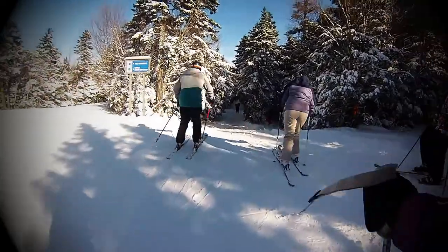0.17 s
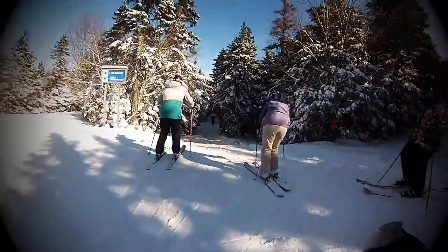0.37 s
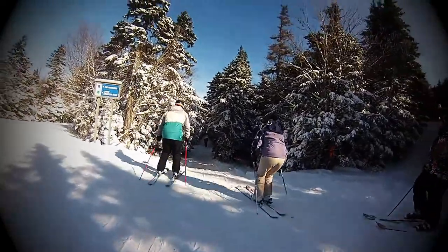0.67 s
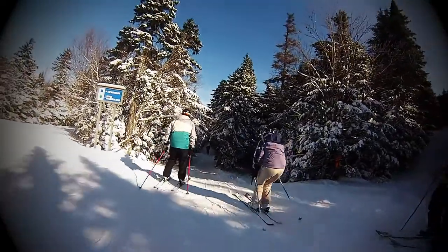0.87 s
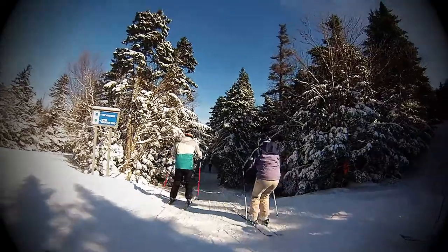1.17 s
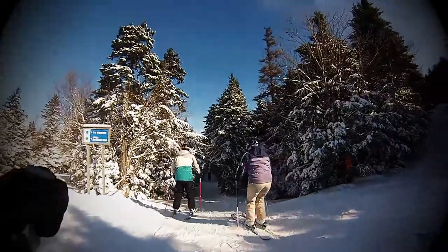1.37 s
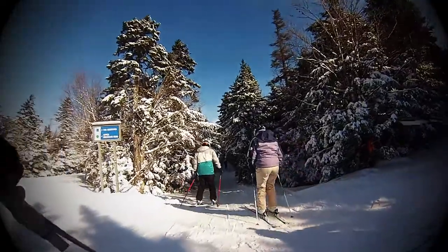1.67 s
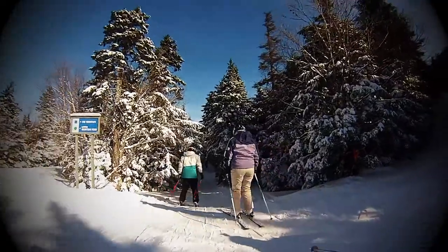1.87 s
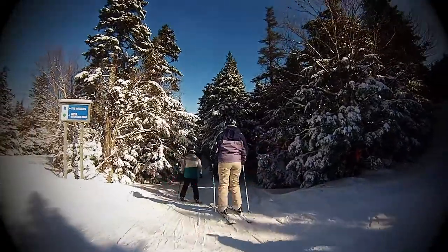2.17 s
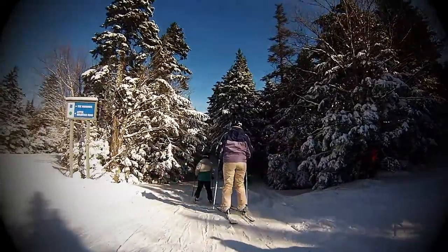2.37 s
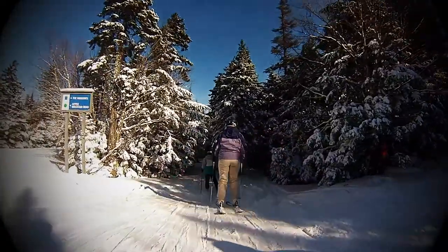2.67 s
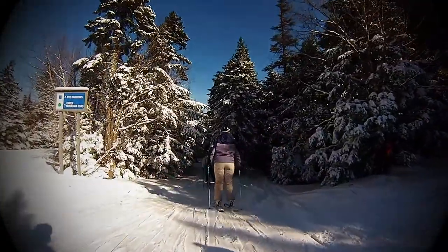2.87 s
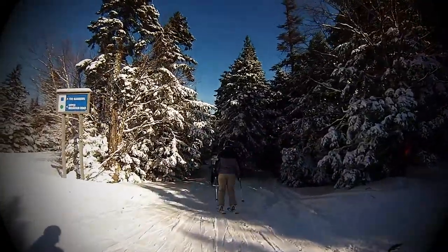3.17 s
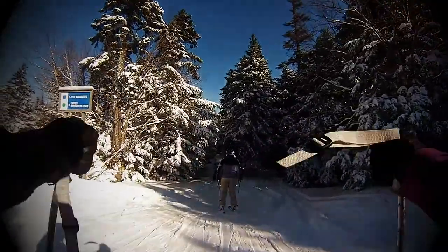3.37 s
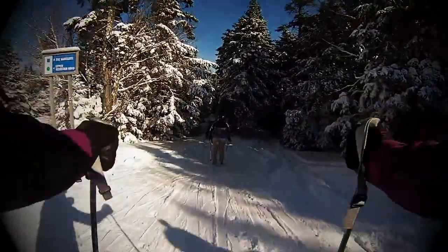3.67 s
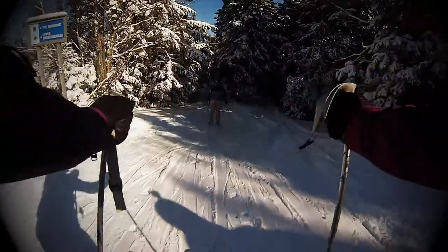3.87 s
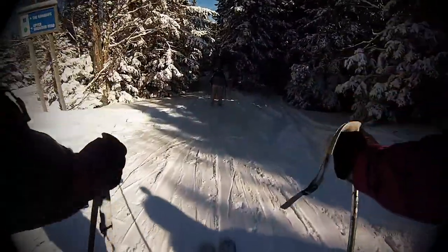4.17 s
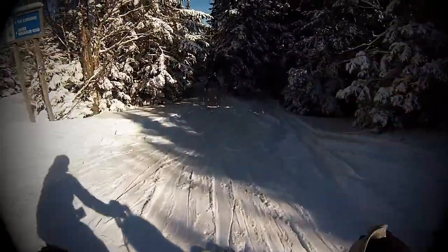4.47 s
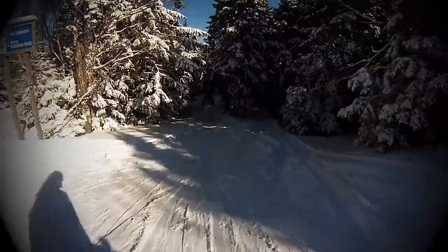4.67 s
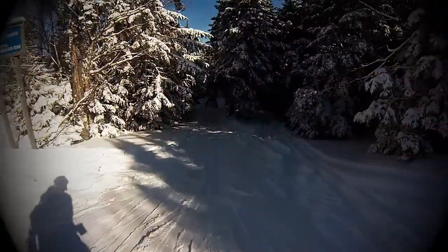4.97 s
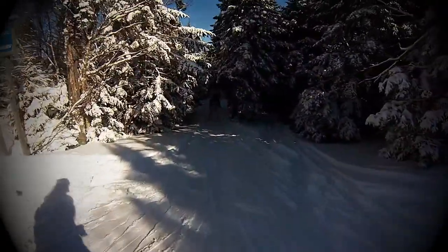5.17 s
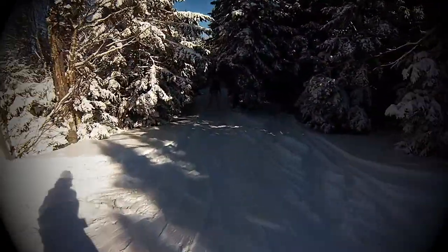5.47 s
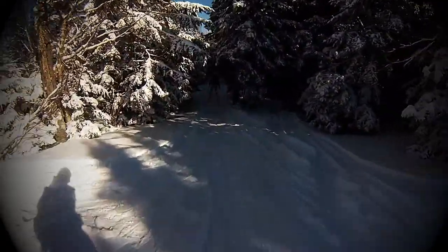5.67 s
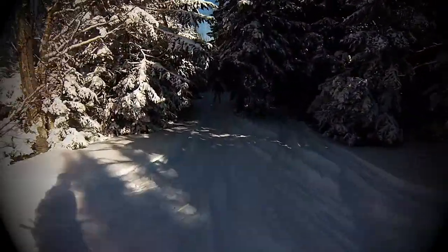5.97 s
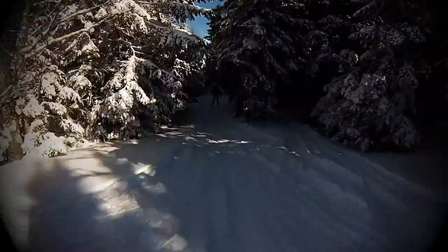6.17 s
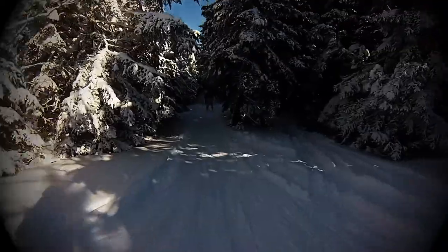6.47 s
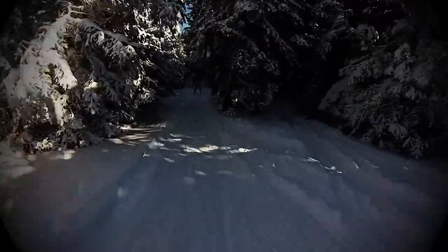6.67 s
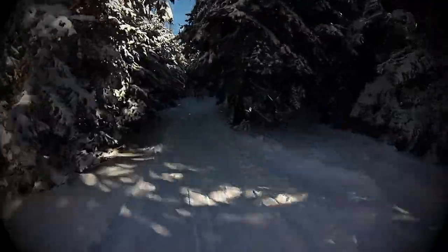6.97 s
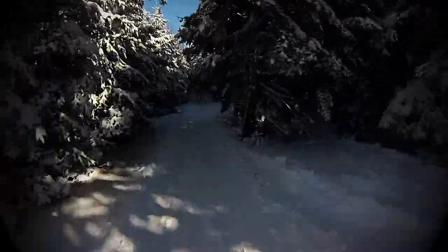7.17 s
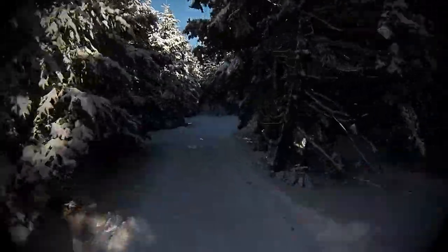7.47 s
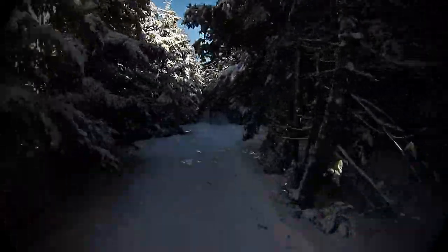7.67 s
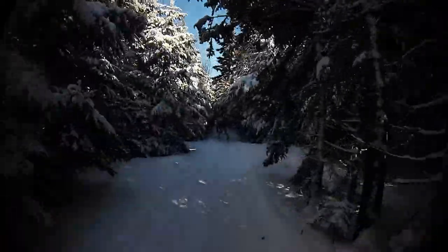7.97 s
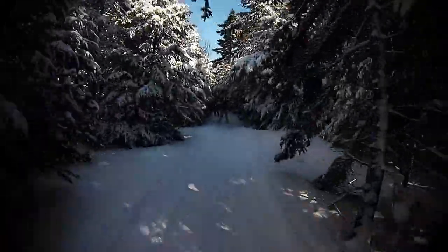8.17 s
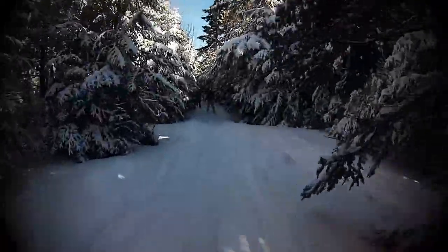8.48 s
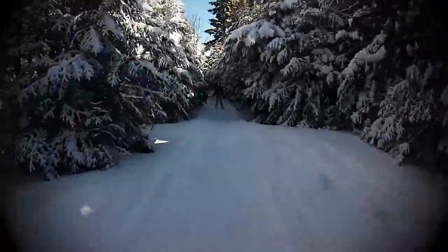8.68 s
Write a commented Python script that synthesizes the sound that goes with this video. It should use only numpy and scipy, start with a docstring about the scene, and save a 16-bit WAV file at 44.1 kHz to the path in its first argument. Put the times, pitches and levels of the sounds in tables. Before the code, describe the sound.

Close-up skiing: rattly slapping skis, crunching snow and gear knocks under rumbling wind gusts, fading into a faint glide with sparse clicks.

```python
"""Skis on packed snow

Heard from a camera worn by the skier: everything is close, and only the spray has stereo width.
Bases, edges and packing snow are random grains ringing resonances, pulsed by ridges and pushes.
Slaps, knocks and ticks are short bursts or rings; groans are rough tones; carving edges sing.
Wind on the microphone is filtered noise with a throb and single low-pitched eddies.
"""
import sys
import numpy as np
from scipy import signal
from scipy.fft import rfft, irfft
from scipy.io import wavfile
from scipy.ndimage import uniform_filter1d, map_coordinates

SR = 44100
rng = np.random.default_rng(int(sys.argv[2]) if len(sys.argv) > 2 else 0)


def inscribe(sig):
    """Save sig as 16-bit PCM at rate SR to the path in sys.argv[1].

    A 1-D sig is mono; a 2-D sig holds one channel per row.
    Samples are clipped to [-1, 1] before scaling.
    """
    pcm = np.round(np.clip(np.atleast_2d(sig).T, -1, 1) * 32767)
    wavfile.write(sys.argv[1], SR, pcm.astype(np.int16))


N = 389844
TIME = np.arange(N) / SR
TAPS = 8192  # length of the filter design [samples]
HZ = np.fft.rfftfreq(TAPS, 1 / SR)


def gain_of(db):
    """Decibels to amplitude."""
    return 10 ** (np.asarray(db) / 20)


def evened(x):
    """Scales to rms 1."""
    return x / np.sqrt(np.mean(x ** 2) + 1e-20)


def curve(rows, axis=1):
    """One column of a control table, joined by straight lines, at every sample."""
    rows = np.asarray(rows)
    return np.interp(TIME, rows[:, 0], rows[:, axis])


def swell(events, axis):
    """Smooth rises and falls [dB] for (centre, length, ..) rows, as high as the given column."""
    total_db = 0
    for row in events:
        half_turns = np.clip((TIME - row[0]) / row[1], -.5, .5)
        total_db = total_db + row[axis] * np.cos(np.pi * half_turns)
    return total_db


def read(points, hz=HZ):
    """A spectrum table on a log-frequency axis."""
    f, value = np.transpose(points)
    return np.interp(np.log(hz + 1), np.log(f + 1), value)


def add(mix, s, sound):
    """Mixes a sound in at time s."""
    part = mix[max(round(s * SR), 0):][:len(sound)]
    part += sound[:len(part)]


def body(modes):
    """Gain over frequency of steep-sided resonances, their powers summed."""
    power = 0
    for f, width, db in modes:
        detuning = (HZ ** 2 - f ** 2) / (2 * (HZ + 1) * width)
        power = power + (gain_of(db) / (1 + detuning ** 2 * 2)) ** 2
    return np.sqrt(power)


def colour(x, gain):
    """Minimum-phase filter with the given gain over frequency, scaled to a top gain of 1."""
    log_gain = np.log(np.maximum(gain / gain.max(), 1e-5))
    circle = np.concatenate([log_gain, log_gain[-2:0:-1]])
    response = irfft(np.exp(np.conj(signal.hilbert(circle)))[:len(HZ)])
    return signal.fftconvolve(x, response[:TAPS // 2])[:len(x)]


def wander(rate_hz):
    """Slow chance of rms 1, up to about the given rate."""
    hz = np.fft.rfftfreq(N, 1 / SR)
    shape = hz / (hz + 2) / (1 + (hz / rate_hz) ** 4)
    return evened(irfft(rfft(rng.standard_normal(N)) * shape, N))


def grains(per_s, spread_db, smooth):
    """Snow crystals breaking: clicks of uneven size over a smooth rub."""
    size = gain_of(spread_db * np.minimum(rng.exponential(1, N), 4))
    clicks = size * rng.choice([-1, 1], N) * (rng.random(N) < per_s / SR)
    return evened(evened(clicks) + smooth * rng.standard_normal(N))


def rub(drive, gain, pressure_db):
    """A drive, pulsed by the pressure, rings a resonant body; rms 1."""
    return evened(colour(drive * gain_of(pressure_db), gain))


def flex(x, share, rate_hz):
    """The skis bend, so their resonances slide up and down by a small share."""
    position = np.cumsum(1 + share * wander(rate_hz))
    return map_coordinates(x, [position], order=3, mode="mirror")


# ridges in the track: (time [s], depth of the chatter [dB], mean rate [ridges/s])
RIDGES = [(0, 0.5, 35.5), (.36, 0.5, 31.5), (2.1, 2, 35.8), (4.4, 1.5, 30), (6.6, 0, 51), (8.84, -1.5, 49)]


def contact(jitter=0.4, lumps_db=0.18):
    """Pressure of the skis on the snow in dB: nearly regular ridges and random lumps."""
    turns = np.cumsum(curve(RIDGES, axis=2) * (1 + jitter * wander(33.6))) / SR
    return curve(RIDGES) * np.cos(2 * np.pi * turns) + lumps_db * wander(55)


# levels along the run, before the trims and pushes:
# (time [s], bases sliding [dB], edges scraping [dB], treble bite of the edges [dB], snow packing [dB])
SNOW = [(0.0, -51, -56.5, -59, -60), (2.09, -57, -63, -66, -64), (2.21, -52, -57.5, -59, -54),
        (2.29, -56, -60.5, -64.5, -59.5), (3.54, -59, -58.5, -63.5, -61.5), (3.84, -57, -56, -60.5, -59),
        (4.43, -56, -55.5, -61.5, -58.5), (4.53, -59, -62, -66, -62), (4.95, -59, -60, -61.5, -58),
        (5.22, -61.5, -62.5, -65, -59.5), (5.71, -64.5, -67.5, -71.5, -63.5), (5.96, -64.5, -64, -69, -63),
        (6.38, -66.5, -63, -66, -71.5), (6.92, -61.5, -70.5, -70, -62.5), (7.85, -68.5, -63.5, -68, -69.5),
        (8.69, -63.5, -65.5, -65.5, -64), (8.84, -65, -63, -66.5, -63)]
# pressing into the snow (+) or going light (-):
# (centre time [s], length [s], change on the bases [dB], change on the edges [dB])
PUSHES = [(.42, 0.62, -3, -3), (.85, 0.14, 4.5, 2.5), (1.2, 0.47, -3.5, -2.5), (1.63, 0.3, -3.5, 0),
          (1.86, 0.15, 0.5, 2.5), (2.66, 0.5, 3.5, 2), (3.12, 0.3, -6.5, -5.5), (3.37, 0.18, 3.5, 2),
          (3.73, 0.23, 1.5, 3), (5.36, 0.097, -7, 3), (6.48, 0.29, -1, -2.5), (6.6, 0.13, 4, 2.5),
          (6.85, 0.19, -2, 10.5), (6.96, .11, 1, 7), (7.045, 0.12, 0.5, 10), (7.33, .1, 4, -1),
          (7.8, 0.29, -1.5, -5.5), (7.96, 0.072, 1, -2), (8.07, 0.1, 7.5, -0.5), (8.34, 0.17, 5.5, -0.5)]
# weight on the edges, which deepens the rasp: (time [s], share [0-1])
WEIGHT = [(0, 0.2), (3.7, 0.23), (4.2, 0.68), (5.6, 0.16)]
# resonances of skis and camera housing under sliding, scraping and packing:
# (frequency [Hz], width [Hz], relative level [dB])
BASE_MODES = [(1430, 247, -0.5), (1600, 200, 0), (2400, 260, -7.5), (854, 210, -14)]
EDGE_MODES = [(2031, 44, 5.3), (2248, 440, 1)]
CRUNCH_MODES = [(310, 247, -2), (520, 440, -12), (700, 190, -2), (1210, 450, -1.5)]
# a lightly and a heavily loaded edge: (frequency [Hz], width [Hz], relative level [dB])
LIGHT_MODES = [(3713, 390, 2.5), (4816, 310, -0.5), (5190, 270, 1.5), (6520, 3200, -8)]
HEAVY_MODES = [(3224, 135, 2.5), (3574, 400, 0), (4580, 710, -9), (6400, 1450, -15.5)]
BASE_DB, SCRAPE_DB, BITE_DB, CRUNCH_DB = 0, -0.5, 0, -2.5  # trim of each kind of rubbing


def skis(pressure_db, uneven_db=1.0):
    """Bases sing, edges rasp and deepen under weight, and the snow crunches beneath."""
    glide_db, edge_db, bite_db, crunch_db = (curve(SNOW, axis=k) for k in range(1, 5))
    flat_db, edging_db = swell(PUSHES, axis=2), swell(PUSHES, axis=3)

    bases = rub(grains(650, 2.2, 0.56), body(BASE_MODES), pressure_db + 1.0 * wander(60))
    bases = flex(bases, 0.01716, 20.05)
    crunch = rub(grains(700, 4.1, 0.57), body(CRUNCH_MODES), 1.9 * pressure_db + 2.1 * wander(27))
    scrape = rub(grains(1200, 2.5, 0.73), body(EDGE_MODES), 1.0 * pressure_db + 1.1 * wander(27))
    scrape = flex(scrape, 0.01414, 18.2)

    light, heavy = (rub(grains(2500, 4.0, 1.0), body(modes), 0.21 * pressure_db + 1.18 * wander(21))
                    for modes in (LIGHT_MODES, HEAVY_MODES))
    weight = np.clip(curve(WEIGHT), 0, 1)
    bite = np.sqrt(1 - weight) * light + np.sqrt(weight) * heavy  # equal-power crossfade

    rubbing = gain_of(BASE_DB + glide_db + flat_db) * bases
    rubbing += gain_of(SCRAPE_DB + edge_db + edging_db) * scrape
    rubbing += gain_of(BITE_DB + bite_db + 0.77 * edging_db) * bite
    rubbing += gain_of(CRUNCH_DB + crunch_db + 0.53 * flat_db) * crunch
    return gain_of(uneven_db * wander(4.0)) * rubbing


# softer snow packing with a dull scrunch: (time [s], level [dB])
SCRUNCH = [(3.7, -68), (4.05, -62.5), (4.45, -60), (4.6, -64.5), (4.9, -71), (5.2, -76), (5.5, -68),
           (5.8, -65), (5.98, -66.5), (6.12, -70), (7.2, -76), (7.5, -68), (7.75, -74)]
# hard-pressed snow creaking higher up: (time [s], level [dB])
CREAK = [(3.9, -68), (4.0, -63.5), (4.17, -58), (4.3, -62), (4.45, -78)]
# resonances of the two: (frequency [Hz], width [Hz], relative level [dB])
SCRUNCH_MODES = [(495, 190, 5), (670, 103, 0.5)]
CREAK_MODES = [(1013, 300, 0)]


def scrunch(pressure_db, clump_db=1.0):
    """Soft snow collapses in coarse clumps, and creaks higher where it is pressed hard."""
    clumps_db = pressure_db + clump_db * wander(30)
    dull, creak = (flex(rub(grains(250, 2.3, 0.38), body(modes), clumps_db), 0.0517, 13.8)
                   for modes in (SCRUNCH_MODES, CREAK_MODES))
    return gain_of(curve(SCRUNCH)) * dull + gain_of(curve(CREAK)) * creak


# spectrum of the flying snow: (frequency [Hz], relative level [dB])
SPRAY_COLOUR = [(3290, -7), (5600, -10.5), (5770, -11.5), (6710, -3.5), (7300, -8.5), (8320, -7),
                (9040, -6), (11500, -4.5), (12900, -10), (14400, -9.5), (15300, -13.5)]
# likeness of left and right before the side signal is raised: (frequency [Hz], likeness [0-1])
LIKENESS = [(60, 0.99), (150, 1.0), (380, 0.68), (950, 0.99), (2380, 1.0), (5980, 0.75), (15000, 0.92)]
SPRAY_DB, SPRAY_FOLLOW = -68.5, 0.061  # mean level, and the share of the edges' swell it follows


def spray(pressure_db):
    """Fine snow hisses in uneven puffs, slightly more as the edges bite, differing between sides."""
    puffs_db = 0.15 * pressure_db + 1.5 * wander(23)
    middle, other = (rub(grains(5000, 4.2, 1.0), gain_of(read(SPRAY_COLOUR)), puffs_db)
                     for _ in range(2))
    same = np.clip(read(LIKENESS), 0, .999)
    width = np.sqrt((1 - same) / (1 + same))  # side-to-middle ratio
    side = gain_of(2.0) * width.max() * colour(other, width)
    bite_db = curve(SNOW, axis=3) + swell(PUSHES, axis=3)
    level_db = SPRAY_DB + SPRAY_FOLLOW * (bite_db - bite_db.mean())
    return gain_of(level_db) * np.array([middle + side, middle - side])


# underlying airflow over the microphone: (time [s], rumble [dB], turbulent flutter [dB])
WIND = [(0, -42.5, -49.5), (1.35, -41, -52.5), (1.85, -46.5, -59.5), (3.1, -48.5, -55.5), (4.2, -43, -59),
        (5.3, -45, -58.5), (6.1, -51.5, -58), (8.15, -49.5, -58), (8.84, -40, -55)]
# gusts on top of it: (centre time [s], length [s], rumble change [dB], flutter change [dB])
GUSTS = [(.26, 0.22, 6.5, -13), (.8, 0.57, 1, -2), (1.12, 0.21, 2, 3.5), (2.22, 0.26, 12, 11.5),
         (2.64, 0.3, 3, 9), (3.33, 0.48, 4.5, 8), (3.8, 0.41, 9, 13), (4.38, 0.38, 1, 1.5),
         (4.82, 0.46, 0, 12), (5.05, 0.41, 7.5, 7), (5.6, 0.3, 6.5, -5), (6.26, 0.15, 11, -6),
         (6.44, 0.086, 10.5, -3), (6.72, 0.15, 10, -6), (7.1, 0.32, 7, 0.5), (7.35, 0.23, 1.5, 5.5),
         (7.74, 0.13, 8, -4), (7.87, 0.2, 5, 5), (8.57, 0.16, 3.5, 2.5), (8.77, 0.092, 1, 3)]
# vortices shed by the camera: (time [s], throb level [dB], mean rate [vortices/s])
SHEDDING = [(0.3, -56, 45), (.42, -45, 59), (.7, -39, 33.4), (1.1, -35, 43), (1.35, -48, 40),
            (1.8, -64, 40), (4.95, -53, 36), (5.08, -42, 34), (5.32, -51, 38), (5.6, -35.5, 36),
            (5.8, -47, 35.8), (6.0, -63, 29)]
# spectra of the wind noise: (frequency [Hz], relative level [dB])
RUMBLE_COLOUR = [(8, -11), (16, 5), (26, -1), (43, -4.5), (58, -10), (90, -17.5), (200, -53.5), (500, -71)]
FLUTTER_COLOUR = [(35, -13.5), (70, 0.5), (110, 0.5), (160, -8), (250, -13), (400, -23), (900, -56),
                  (3000, -78.5)]


def wind(lumpy_db=2.5):
    """Slow pressure swings and ragged turbulence follow airflow and gusts; shed vortices throb."""
    rumble = rub(rng.standard_normal(N), gain_of(read(RUMBLE_COLOUR)), 0)
    # evened out over 5000 samples, so that the airflow sets the strength of the rumble
    power = abs(signal.hilbert(rumble)) ** 2 / 2
    rumble = rumble / np.sqrt(uniform_filter1d(power, size=5000))
    flutter = rub(rng.standard_normal(N), gain_of(read(FLUTTER_COLOUR)), 2.77 * wander(25))
    rumble_db = curve(WIND) + swell(GUSTS, axis=2) + lumpy_db * wander(13.2)
    flutter_db = curve(WIND, axis=2) + swell(GUSTS, axis=3)
    turns = np.cumsum(curve(SHEDDING, axis=2) * (1 + .12 * wander(7.3))) / SR
    throb = gain_of(curve(SHEDDING) + 3.4 * wander(5.6)) * np.sin(2 * np.pi * turns)
    return gain_of(rumble_db) * rumble + gain_of(flutter_db) * flutter + throb


# skis slapping over hard ridges: (time [s], level before the common trim [dB])
JUDDERS = [(0.032, -35.5), (.058, -36.5), (.089, -32), (.117, -36), (.149, -40), (0.178, -31), (.186, -34),
           (0.235, -31), (0.247, -35), (0.276, -34), (0.614, -43), (0.643, -46), (0.681, -37), (.794, -53),
           (.853, -39), (0.898, -35), (1.301, -45), (1.738, -38), (1.8, -36), (1.907, -41), (2.129, -33.5),
           (2.277, -39), (2.365, -41), (2.397, -39.5), (2.457, -35.5), (2.475, -38), (2.503, -36.5),
           (2.548, -42), (2.577, -41), (2.635, -34), (2.884, -35.5), (2.937, -36), (2.978, -38.5),
           (3.851, -31), (3.884, -40), (3.917, -38), (3.945, -37), (3.998, -33), (4.025, -35), (4.049, -43),
           (4.073, -37), (4.109, -36), (4.148, -37.5), (4.171, -33), (4.296, -36), (4.323, -37),
           (4.394, -44), (4.425, -46)]
# resonances of a slapped ski: (frequency [Hz], width [Hz], relative level [dB])
SLAP_MODES = [(970, 470, -7), (1510, 305, 4), (2400, 370, -5.5), (3530, 400, -9), (5060, 680, -15.5)]


def judders(trim_db=-5.5, rise_s=0.0022, vary_db=2.0, shift=0.043):
    """Each slap is a short rasp of the ski, coloured a little differently as it bends."""
    out, t = np.zeros(N), np.arange(TAPS // 2) / SR
    for s, db in JUDDERS:
        bent = [(f * (1 + shift * rng.uniform(-1.1, 1)), width, mode_db + vary_db * rng.uniform(-0.85, 1))
                for f, width, mode_db in SLAP_MODES]
        rasp = colour(rng.standard_normal(len(t)) * t * np.exp(-t / rise_s), body(bent))
        add(out, s, gain_of(db + trim_db) * rasp / abs(rasp).max())
    return out


def lift(depth_db=1.5, before_s=0.0064, after_s=0.017, width_s=0.0051):
    """The ski lightens just before each slap and again after it, so the rubbing dips."""
    airborne = 0
    for s, _ in JUDDERS:
        for shift in (-before_s, after_s):
            airborne = airborne + np.exp(-np.minimum(((TIME - s - shift) / width_s) ** 2, 50))
    return gain_of(-depth_db * np.minimum(airborne, 1))


# single eddies striking the microphone: (start time [s], approximate peak [dB], frequency [Hz])
EDDIES = [(0.163, -27.5, 13.4), (0.24, -22.5, 19.6), (.236, -35, 110), (0.326, -28.5, 105),
          (0.823, -35.5, 137), (1.046, -32.5, 142), (1.111, -42, 160), (1.135, -37.5, 130),
          (1.633, -34.5, 87), (2.152, -27, 26.6), (2.159, -39, 160), (2.216, -37, 246), (2.759, -36.5, 150),
          (3.199, -34.5, 86), (3.212, -41.5, 165), (3.313, -34, 58), (3.356, -33, 89), (3.377, -30, 90),
          (3.389, -32, 144), (3.473, -37, 220), (3.763, -22.5, 11), (4.075, -40, 87), (4.617, -32.5, 76),
          (4.738, -36, 89), (4.767, -32.5, 100), (4.786, -37, 123), (4.884, -26.5, 108), (4.925, -32, 63),
          (4.955, -34, 63), (5.025, -21.5, 39.7), (5.570, -33, 40), (6.21, -49, 50), (7.124, -39.5, 87),
          (8.8, -31.5, 77)]


def eddies(cycles=0.82, ragged=0.19):
    """Each eddy pushes and pulls on the microphone once or twice, with ragged swirls in it."""
    out, t = np.zeros(N), np.arange(SR // 4) / SR
    for s, db, hz in EDDIES:
        age = hz * t / cycles  # the envelope peaks at age 1
        envelope = age ** 2 * np.exp(1 - age ** 2)
        swirls = evened(colour(rng.standard_normal(len(t)), 1 / (1 + (HZ / (1.7 * hz)) ** 2)))
        add(out, s, gain_of(db) * envelope * (np.sin(2 * np.pi * hz * t) + ragged * swirls))
    return out


# metal ticks of the poles and strap buckles:
# (time [s], level before the ring and click trims [dB], ring frequency [Hz], ring t60 [s])
TICKS = [(.222, -55, 8500, 0.17), (1.074, -53, 8340, 0.14), (1.860, -50.5, 9050, 0.073),
         (2.056, -54, 7140, 0.025), (2.112, -53, 8400, 0.029), (2.865, -50.5, 8500, 0.082),
         (3.803, -49, 10700, 0.082), (6.874, -57, 8380, 0.062), (7.090, -53, 10400, 0.028)]


def ticks(ring_db=-4, click_t60=0.064, click_db=-1):
    """A dry click and a thin, rough metal ring."""
    out, t = np.zeros(N), np.arange(SR // 3) / SR
    for s, db, hz, t60 in TICKS:
        burst = rng.standard_normal(len(t)) * gain_of(-60 * t / click_t60)
        click = colour(burst, body([(3900, 400, -24), (8500, 3900, 10)]))
        shimmer = evened(colour(rng.standard_normal(len(t)), body([(hz, 200, 0)])))
        envelope = gain_of(-60 * t / t60) * (1 - np.exp(-t / 0.00076))
        ring = (.5 * np.sin(2 * np.pi * hz * t) + 0.93 * shimmer) * envelope
        tick = gain_of(ring_db) * ring + gain_of(click_db) * click / abs(click).max()
        add(out, s, gain_of(db) * tick)
    return out


# skis, boots and poles knocking: (time [s], peak [dB], centre [Hz], breadth [octaves])
KNOCKS = [(1.051, -37, 3510, 3), (1.052, -49, 550, 1.3), (1.073, -36, 4570, 1.4), (1.216, -48, 4000, 0.22),
          (1.254, -45.5, 4180, 0.3), (2.057, -40, 4580, 0.25), (2.174, -40, 1500, 0.52),
          (2.216, -35, 2000, 1.1), (2.218, -32.5, 700, 1.6), (2.765, -38, 3000, 1.2),
          (3.053, -38, 1500, 0.099), (3.055, -34, 2100, 0.3), (3.056, -46, 3660, .5),
          (3.095, -39, 1640, 0.34), (3.249, -38, 1530, 0.6), (3.804, -30, 3900, 0.34),
          (4.887, -37.5, 396, 0.77), (5.32, -42.5, 1575, 1), (5.365, -44, 2090, 0.74),
          (5.889, -43.5, 1320, 1.1), (5.961, -40.5, 1703, 0.94), (6.02, -40, 1510, 1.5),
          (6.145, -51, 1640, 0.29), (6.175, -38.5, 1300, 1.13), (6.209, -42.5, 1600, 1.5),
          (6.25, -48, 4430, .6), (6.331, -41.5, 2470, 0.27), (6.335, -45, 2900, .5),
          (6.958, -43.5, 1160, 0.7), (7.105, -44, 2060, 0.83), (7.626, -41.5, 1620, 1.13),
          (7.679, -41.5, 1290, 0.93), (7.996, -39.5, 1700, 0.93), (8.206, -46, 3200, .8),
          (8.309, -43.5, 750, 0.64), (8.668, -44, 2814, 1.9), (8.693, -48, 1495, 0.99),
          (8.757, -39, 2400, 2), (8.763, -46, 808, 1.06), (8.802, -38.5, 1900, 1), (8.815, -43, 1880, 0.82)]
# resonances of the gear: (frequency [Hz], width [Hz], relative level [dB])
KNOCK_MODES = [(560, 1140, 2.5), (1220, 160, 6), (1480, 120, -0.5), (1790, 180, -3), (2030, 155, 5.5),
               (2290, 150, 5), (2620, 150, -2.5), (3320, 94, 3.5), (3720, 260, -2), (4820, 370, -4),
               (6100, 1900, -10.5)]


def knocks(grit=0.2, vary_db=-0.5):
    """A blow and a short crumble of grit ring the gear around one region of its modes."""
    out, t = np.zeros(N), np.arange(TAPS // 2) / SR
    crumble = gain_of(-60 * t / .02)  # falls 60 dB in 20 ms
    for s, db, hz, octaves in KNOCKS:
        blow = grit * rng.standard_normal(len(t)) * crumble + (t == 0)
        struck = [(f, width, mode_db + vary_db * rng.uniform(-1, 1)) for f, width, mode_db in KNOCK_MODES]
        region = 1 / (1 + (np.log2((HZ + 1) / hz) / octaves) ** 2)
        ring = colour(blow, body(struck) * region)
        add(out, s, gain_of(db) * ring / abs(ring).max())
    return out


# the snow giving way under the skis in hollow groans:
# (start time [s], length [s], level before the common trim [dB], middle pitch [Hz])
GROANS = [(1.514, 0.015, -47.5, 762), (1.55, 0.013, -53, 653), (1.738, .011, -52.5, 780),
          (2.868, .012, -50, 700), (2.937, .012, -53, 700), (3.997, 0.014, -48, 650),
          (4.026, 0.018, -49, 542), (4.109, .022, -52, 560), (4.147, 0.023, -50, 520),
          (4.168, 0.018, -46.5, 573), (4.294, 0.017, -45, 520), (4.318, 0.019, -46, 524),
          (4.358, 0.019, -51, 473), (4.392, 0.013, -43, 620), (4.422, 0.018, -49.5, 560),
          (4.788, .017, -47, 587), (4.832, .014, -56, 545), (4.854, .017, -49, 540),
          (4.885, .014, -50, 600), (4.916, .012, -47, 520), (4.99, .03, -55, 582), (5.795, 0.02, -66, 520),
          (5.9, .04, -58, 520), (5.92, .03, -61, 770), (5.944, 0.046, -60.5, 670), (7.275, 0.065, -62, 473),
          (7.45, 0.053, -59, 445), (7.527, 0.045, -63, 609.5), (7.614, 0.054, -62, 574)]


def groans(trim_db=-2, sag=0.033, rough=0.19):
    """A short rough tone swells and fades, falling a little in pitch."""
    out = np.zeros(N)
    for s, length, db, hz in GROANS:
        age = np.linspace(0, 1, round(length * SR))
        creak = evened(colour(rng.standard_normal(TAPS), body([(hz, 220, 0), (2 * hz, 260, -3)])))
        creak = creak[-len(age):]  # the end, where the resonance has built up
        tone = np.sin(2 * np.pi * np.cumsum(hz * (1 + sag * (.5 - age))) / SR)
        add(out, s, gain_of(db + trim_db) * np.sin(np.pi * age ** 0.89) * (tone + rough * creak))
    return out


# an edge singing as it carves: (centre time [s], length [s], song [dB], bright zing [dB])
CARVES = [(3.739, 0.13, -50.5, -58.5), (4.753, 0.2, -57, -63.5), (4.914, .22, -51.5, -59),
          (5.045, 0.16, -54.5, -70)]
# a carving edge and its bright overtones: (frequency [Hz], width [Hz], relative level [dB])
CARVE_MODES = [(2017, 130, 5), (2300, 170, -0.5), (1280, 110, -3), (594, 380, -11.5)]
ZING_MODES = [(3510, 450, 1.5), (5030, 220, 1), (6300, 730, -9.5)]


def carving(pressure_db, bend=0.01185, chatter=1.1, surge_db=1.5):
    """Each carve swells and fades: the edge sings, with a bright zing above it."""
    sing, zing = (flex(rub(grains(1500, 2.9, 1.0), body(modes), chatter * pressure_db), bend, 11.1)
                  for modes in (CARVE_MODES, ZING_MODES))
    out = np.zeros(N)
    for s, length, sing_db, zing_db in CARVES:
        arch = np.maximum(1 - (2 * (TIME - s) / length) ** 2, 0)
        out += arch * (gain_of(sing_db) * sing + gain_of(zing_db) * zing)
    return out * gain_of(surge_db * wander(25))


def scene():
    """Everything is close and central; only the spray has some width."""
    pressure_db = contact()
    rubbing = lift() * (skis(pressure_db) + scrunch(pressure_db))
    sliding = rubbing + carving(pressure_db) + spray(pressure_db)
    return sliding + judders() + groans() + knocks() + ticks() + wind() + eddies()


def record(dry):
    """The camera's band limit: a steep low-pass at 15350 Hz."""
    lowpass = signal.firwin(511, 15350, window=("kaiser", 9), fs=SR)
    return signal.oaconvolve(dry, lowpass[None], "same")


dry = scene()
out = record(dry)
inscribe(out)
```